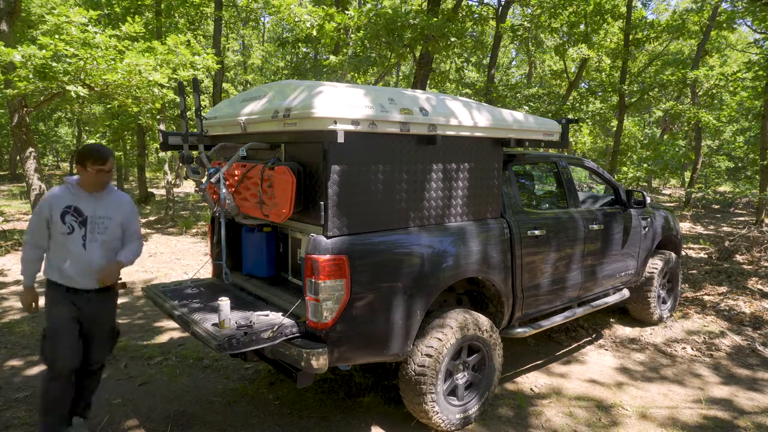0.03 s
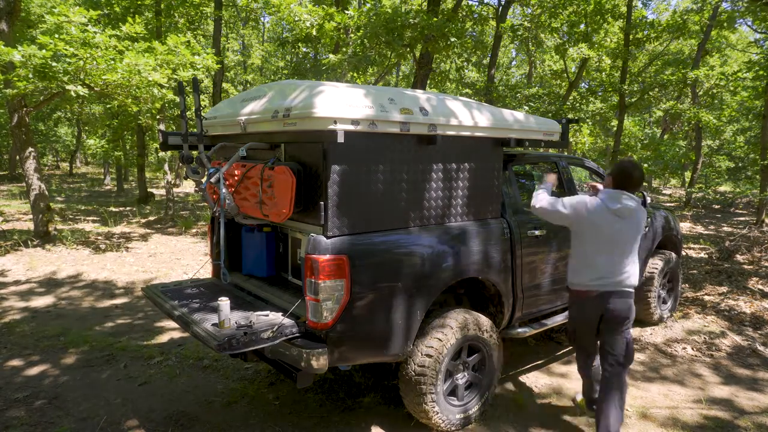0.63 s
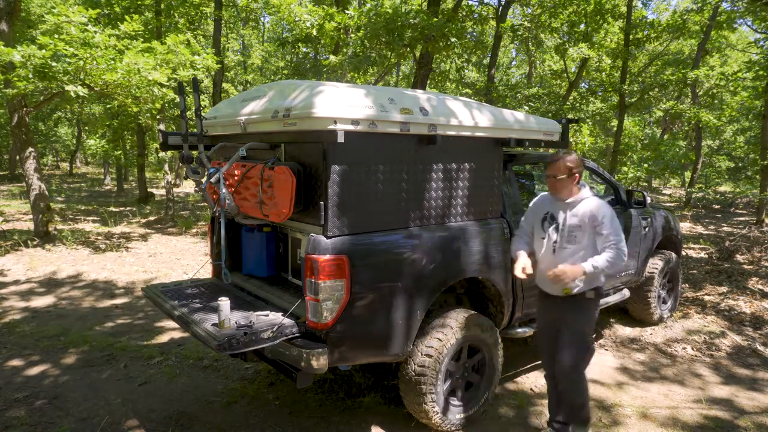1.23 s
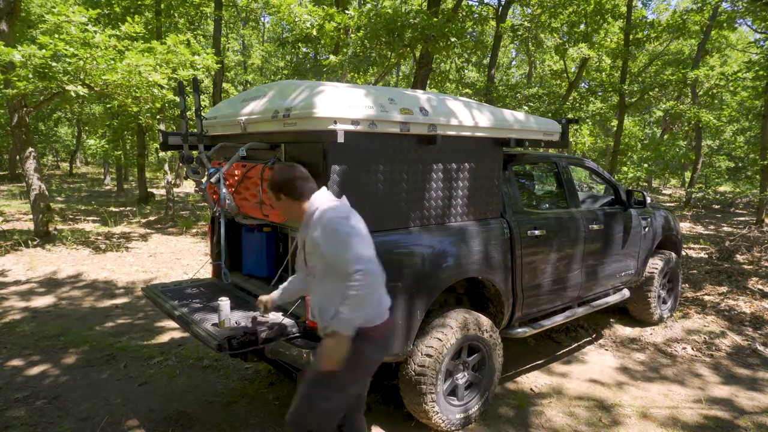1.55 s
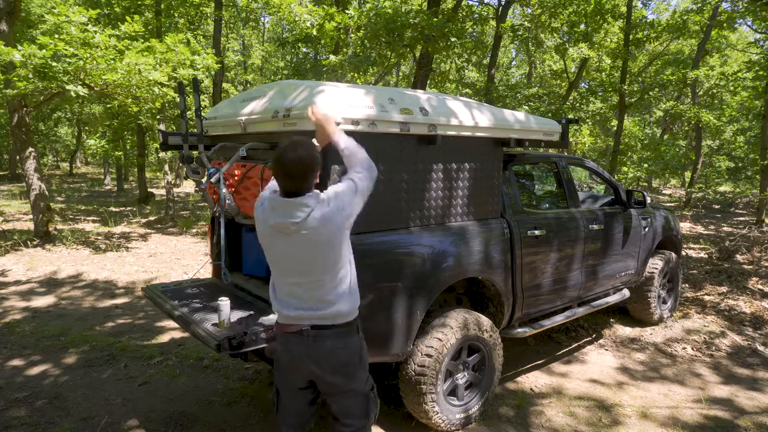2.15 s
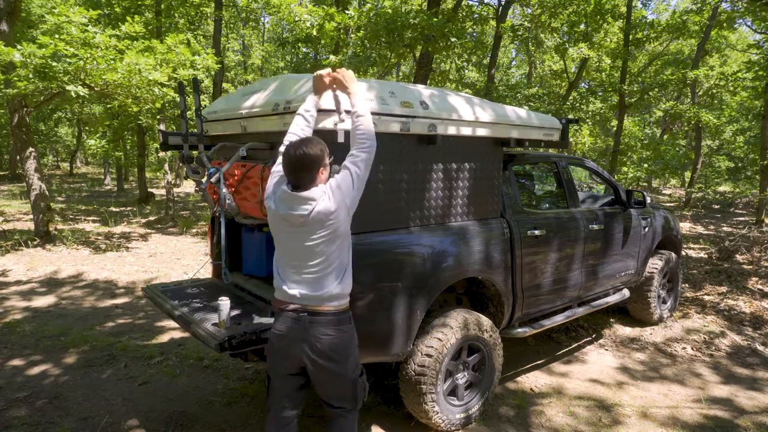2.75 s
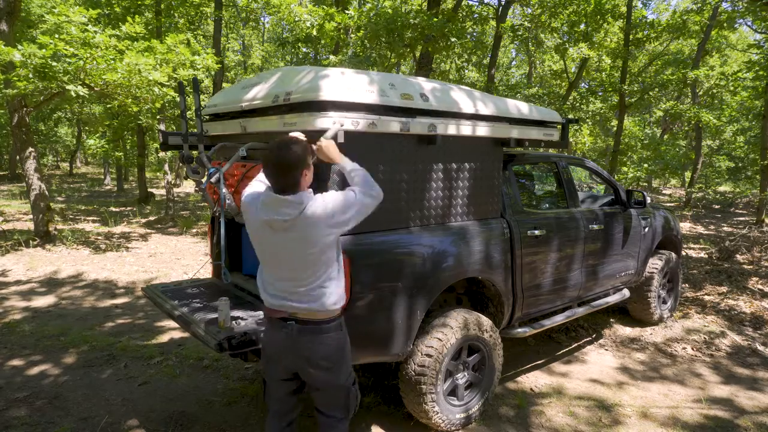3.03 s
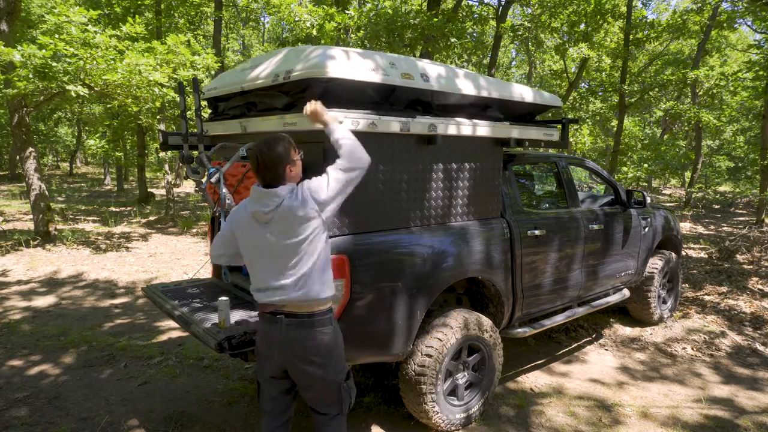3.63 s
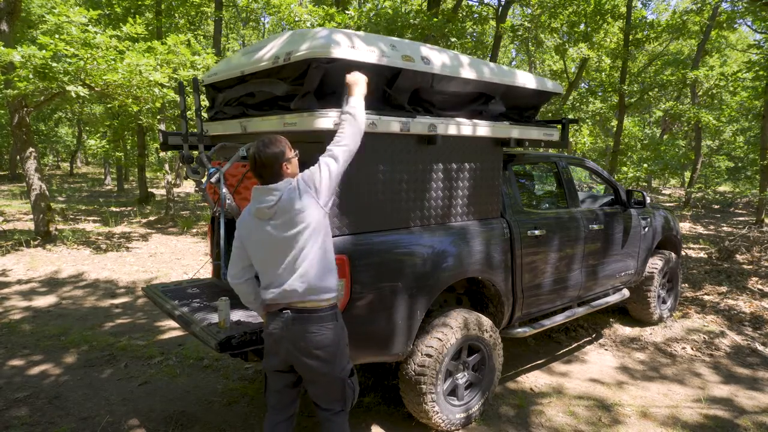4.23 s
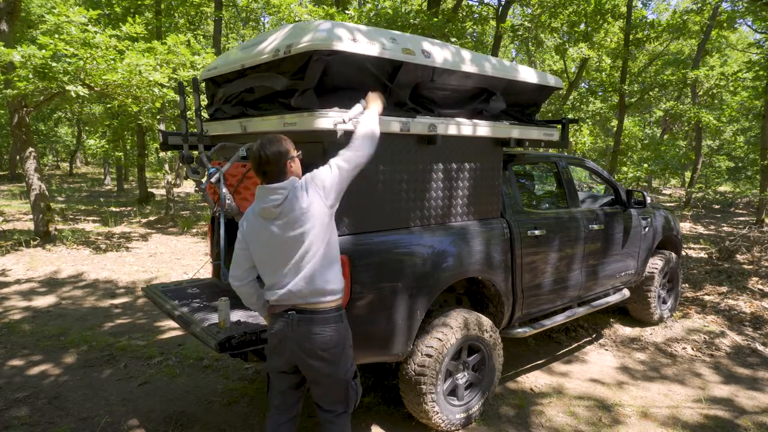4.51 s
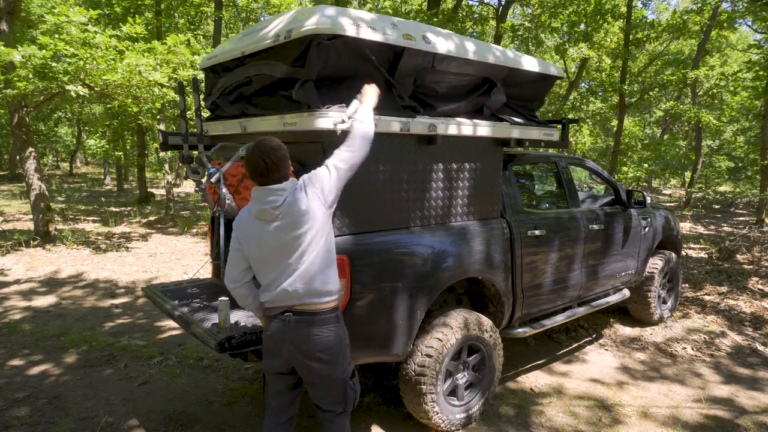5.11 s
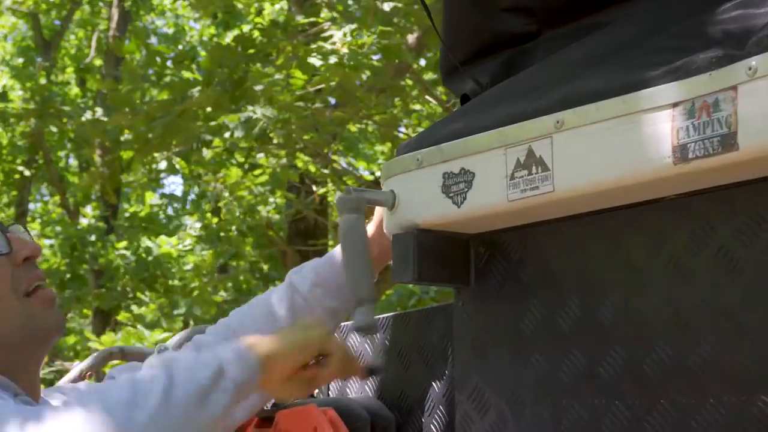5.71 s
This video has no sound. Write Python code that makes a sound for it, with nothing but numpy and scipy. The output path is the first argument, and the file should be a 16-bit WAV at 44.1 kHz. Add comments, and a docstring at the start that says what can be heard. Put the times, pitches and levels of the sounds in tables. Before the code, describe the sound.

Outdoors among trees, someone walks over dry leaves and cracking twigs, and a metal catch snaps open. A cluster of ringing clanks and hollow knocks follows as a crank is fitted to a roof tent. After some brushing of clothes, the crank winds steadily, its ratchet ticking quickly and its gears knocking. Soft wind buffets the microphone over a faint hush of foliage.

```python
"""In a wood, a man walks round a pickup: dry leaves crackle and twigs snap under his feet.
He frees the catch of a hard-shell roof tent and pushes a steel crank into its socket, so that the
steel rings and the hollow shell knocks. His sleeves brush as he winds the lid up: a pawl (a small
sprung finger) ticks over the teeth of the ratchet wheel, and the gears knock.
A light breeze rumbles on the microphone over the hush of the trees."""
import sys
import numpy as np
from scipy import signal
from scipy.fft import rfft, irfft, next_fast_len
from scipy.io import wavfile
from scipy.ndimage import map_coordinates

SR = 44100
rng = np.random.default_rng(int(sys.argv[2]) if len(sys.argv) > 2 else 0)


def put_to_file(sound):
    """Save the sound as 16-bit audio at rate SR, in the file named by the first command-line argument."""
    columns = np.atleast_2d(sound).T  # one column per channel
    safe = np.clip(columns, -1, 1)
    whole_steps = np.round(safe * 32767)
    wavfile.write(sys.argv[1], SR, whole_steps.astype(np.int16))


N = 254016

# tone of the rattling winch (pitch [Hz], level [dB])
WINCH_TONE = [(240, -45), (400, -17), (595, -8.5), (847, -6.5), (1490, -15), (2120, -9), (3850, -13.5),
              (4490, -13), (8280, -20), (9790, -30), (15500, -37)]


def amp(db):
    """Turn decibels into a number to multiply by."""
    return 10 ** (np.asarray(db) / 20)


def unit(x):
    """Scale a sound to an average strength (rms) of 1."""
    return x / np.sqrt(np.mean(x ** 2) + 1e-20)


def curve(points):
    """Join (time [s], value) points with straight lines, one value per sample."""
    times, values = np.transpose(points)
    return np.interp(np.arange(N) / SR, times, values)


def wobble(rate):
    """A smooth curve through `rate` random values a second."""
    return map_coordinates(rng.standard_normal(int(N * rate / SR) + 4), [np.arange(N) * rate / SR])


def filtered(x, response):
    """Multiply each frequency in a sound by response(frequency)."""
    size = next_fast_len(len(x) + SR // 10)
    return irfft(rfft(x, size) * response(np.fft.rfftfreq(size, 1 / SR)), size)[:len(x)]


def coloured(x, tone):
    """Shape a sound's bass and treble by (pitch [Hz], level [dB]) points."""
    pitches, db = np.transpose(tone)
    return filtered(x, lambda hz: amp(np.interp(np.log(hz + 1), np.log(pitches + 1), db)))


def resonate(x, notes):
    """Pass a sound through an object that rings at (pitch [Hz], width [Hz], level [dB])."""
    return filtered(x, lambda f: sum((-1) ** k * amp(db) * 1j * f * width
                                     / (hz * hz - f * f + 1j * f * width)
                                     for k, (hz, width, db) in enumerate(notes)))


def noise(tone, size=N):
    """Smooth noise with the given tone."""
    return unit(coloured(rng.standard_normal(size), tone))


def gritty(tone, size, grit_db):
    """Rough noise made of tiny contacts of uneven size."""
    sizes = amp(grit_db * np.clip(rng.standard_normal(size), -2, 2))
    return unit(coloured(rng.standard_normal(size) * sizes, tone))


def fade(t, attack, t60):
    """Rise quickly to 1, then die away; t60 is the fade time, the seconds taken to drop 60 dB."""
    shape = (1 - np.exp(-t / attack)) * amp(-60 * t / t60)
    return shape / shape.max()


def burst(x, shape):
    """Give noise a loudness shape, and exactly the energy of that shape."""
    return unit(x * shape) * np.sqrt(np.mean(shape ** 2))


def ringing(notes, t, spread_db):
    """The fading notes of struck metal, at new strengths for every blow."""
    return sum(amp(db + spread_db * rng.standard_normal() - 60 * t / t60)
               * np.sin(2 * np.pi * (hz * t + rng.random())) for hz, db, t60 in notes)


def add(track, start, sound):
    """Mix a sound into the track at `start` seconds."""
    room = track[max(round(start * SR), 0):][:len(sound)]
    room += sound[:len(room)]


def passes(position):
    """The samples at which a rising position passes a whole number."""
    return np.flatnonzero(np.diff(np.floor(position)))


def breeze(rumble_db=-1, flutter_db=-8.5, hush_db=-52):
    """Lumpy wind on the microphone over the steady hush of the trees."""
    # strength of the wind (time [s], level [dB])
    wind = [(0, -46), (0.3, -42.5), (0.78, -45), (1.1, -52.5), (1.33, -46), (1.62, -47.5), (2.0, -37),
            (2.45, -46.5), (2.65, -39), (3.37, -43.5), (3.5, -51), (3.9, -45.5), (4.2, -41), (4.45, -49.5),
            (4.95, -48.5), (5.19, -52), (5.31, -36.5), (5.76, -56.5)]
    # hush of the trees (pitch [Hz], level [dB])
    hush_tone = [(100, -17), (250, 2.5), (500, -3), (900, -3.5), (1500, -1.5), (3000, -10.5), (6000, -14.5),
                 (10000, -21.5), (16000, -26)]
    wind_db = curve(wind)
    gust_db = wind_db - wind_db.mean()
    rumble = amp(rumble_db + 0.95 * gust_db + 2.6 * wobble(14))
    rumble *= noise([(10, -20), (22, -3), (75, -2), (110, -10.5), (170, -35), (400, -94)])
    flutter = amp(flutter_db + 1.22 * gust_db)  # grows faster than the rumble: gusts are brighter
    flutter *= noise([(70, -43), (115, -0.5), (190, -7), (300, -15), (500, -31.5), (1200, -45)])
    return amp(wind_db.mean()) * (rumble + flutter) + amp(hush_db) * noise(hush_tone)


def sweeps(sole_db=-4, swell_s=0.014, settle_s=0.029):
    """Loudness of the rustle: each heel, sole and sleeve swells quickly and settles more slowly."""
    # steps in the leaves (time [s], heel level [dB], wait until the sole lands [s])
    steps = [(0.06, -30.5, 0.13), (0.379, -24.5, 0.11), (0.6, -36, 0.084), (0.81, -37.5, 0.072),
             (1.21, -30.5, 0.14), (1.454, -36.5, 0.072), (1.655, -43, 0.1005)]
    # sleeves brushing as the arms work (time [s], level [dB])
    sleeves = [(1.82, -36), (2.345, -31), (2.58, -36.5), (2.72, -39), (2.855, -30.5), (2.965, -38.5),
               (3.05, -39.5), (3.29, -54), (3.44, -48), (5.39, -32.5)]
    heels = [(start, db) for start, db, wait in steps]
    soles = [(start + wait, db + sole_db) for start, db, wait in steps]
    now = np.arange(N) / SR
    return sum(amp(db) * np.exp(-np.abs(now - peak) / np.where(now < peak, swell_s, settle_s))
               for peak, db in heels + soles + list(sleeves))


def rustle(grains_per_s=1500, stalks_per_s=60, crackle_db=-12, brush_db=-13.5, stalk_db=-18.5):
    """Leaves brush and crackle and stalks break underfoot; once he stands still, his clothes rustle."""
    # tone of dry leaves, also used for the cloth (pitch [Hz], level [dB])
    leaf_tone = [(530, -62), (900, -9), (1430, 1.5), (1590, 0), (1730, -2.5), (2150, 1), (15500, -0.5)]
    walking = np.arange(N) / SR < 1.7
    sizes = amp(4.5 * np.minimum(rng.exponential(size=N), 3.5))
    grains = (rng.random(N) < grains_per_s / SR) * rng.choice([-1, 1], N) * sizes
    crackle = amp(crackle_db) * unit(coloured(grains, leaf_tone))
    breaks = (rng.random(N) < stalks_per_s / SR) * rng.uniform(-0.73, 1, N)
    stalks = amp(stalk_db) * walking * unit(resonate(breaks, [(2800, 700, 0), (4600, 1500, -2)]))
    shuffle = amp(np.where(walking, -42, -49) + 3 * wobble(19.52))  # leaves and cloth never quite rest
    loudness = (sweeps() + shuffle) * amp(2 * wobble(150))  # the leaves give way in clumps
    brush = amp(brush_db) * noise(leaf_tone)
    return loudness * (crackle + brush + stalks)


def twig_snaps(gain_db=-8):
    """Twigs break underfoot with a short, gritty crack; a thick twig has more body."""
    # breaking twigs (time [s], level [dB], body [dB])
    snaps = [(0.032, -24, -22), (0.118, -22.5, -19), (0.156, -28, -30), (0.197, -22.5, -30),
             (0.475, -25, 6), (0.487, -26.5, -26), (0.532, -13, -11.5), (0.584, -21.5, -7),
             (0.676, -24.5, -15), (0.776, -24, -17), (0.825, -17.5, -45), (0.86, -18, -18.5),
             (1.329, -27.5, -3), (1.449, -22, -16), (1.63, -19.5, -8)]
    out, t = np.zeros(N), np.arange(SR // 10) / SR
    for start, db, body_db in snaps:
        tone = [(150, -29), (500, body_db), (1200, body_db + 2.5),
                (3500, -10.5), (10000, -20.5), (16000, -19.5)]
        crack = burst(gritty(tone, len(t), grit_db=7), fade(t, attack=0.00046, t60=0.014))
        add(out, start, amp(db + gain_db) * crack)
    return out


def clanks(gain_db=-9, ring_db=-9, slide_db=-17, slide_s=0.0028):
    """Catch and crank slide in, scrape, knock the hollow shell and leave the steel ringing."""
    # blows on the shell (time [s], level [dB], amount of knock [dB], fade time of the scrape [s])
    blows = [(0.9165, -11.5, -16, 0.035), (0.925, -18.5, -12, 0.057), (1.842, -22.5, -16.5, 0.043),
             (1.876, -40.5, 12.5, 0.019), (1.934, -11.5, -12, 0.017), (1.955, -12.5, -8.5, 0.031),
             (2.002, -14.5, -9, 0.036), (2.028, -16.5, -4, 0.063), (2.04, -8.5, -11, 0.042),
             (2.059, -19, -1, 0.037), (2.166, -17.5, 2, 0.025), (2.188, -24.5, -4.5, 0.021),
             (2.202, -24.5, -2, 0.058), (2.276, -33.5, -4, 0.047), (2.367, -25.5, 3.5, 0.012),
             (2.416, -27.5, -3, 0.022), (2.449, -20.5, -14, 0.015), (2.5, -29, 4, 0.041),
             (2.54, -34.5, 0, 0.045), (2.602, -32, -4, 0.035)]
    # notes of the crank and the shell that holds it (pitch [Hz], level [dB], fade time [s])
    steel_notes = [(208, -5, .2), (693, -3, .1), (990, 3, .095), (1115, 0, .08), (1365, 0, .1),
                   (1735, -2, .07), (1950, -1, .075), (2610, -2, .07), (2830, -7, .09), (3465, -2, .07),
                   (4210, -3, .06), (7430, -1, .04), (10380, -4, .05)]
    knock_tone = [(100, -1.5), (380, -19), (700, -4), (1150, -0.5), (1800, -3.5), (3200, -30)]
    out, t = np.zeros(N), np.arange(SR // 4) / SR
    for start, db, knock_db, t60 in blows:
        bright_db = -14 - 0.96 * knock_db  # a glancing blow is bright, a square one knocks
        tone = [(900, -14), (2200, 5.5), (4000, 3.5), (9000, bright_db + 4.5), (16000, bright_db - 1.5)]
        scrape = gritty(tone, len(t), grit_db=1.5)
        knock = amp(knock_db) * noise(knock_tone, len(t))
        knock_shape = amp(3) * fade(t, 0.00083, 1.45 * t60)
        shell_shape = amp(-20) * fade(t, 0.0045, 0.076)
        body = amp(knock_db) * burst(knock, knock_shape + shell_shape)
        # a dull blow wakes the low notes, a bright one the high notes
        struck = [(hz, level + np.interp(hz, [1500, 4000, 9000], [knock_db, -3, bright_db + 4]), life)
                  for hz, level, life in steel_notes]
        ring = amp(ring_db) * ringing(struck, t, spread_db=1.5) * (1 - np.exp(-t / 0.00094))
        add(out, start, amp(db + gain_db) * (burst(scrape, fade(t, 0.0012, t60)) + body + ring))
        # the parts rub for a few milliseconds before the blow lands
        slide = (scrape + knock) * np.exp((t - t[-1]) / slide_s)
        add(out, start - t[-1], amp(db + gain_db + slide_db) * slide)
    return out


def steel_ticks(gain_db=3):
    """Steel meets steel in a hard, dry tick as the catch or the crank snaps home."""
    # parts snapping home (time [s], level [dB])
    ticks = [(0.9224, -7.5), (1.8546, -15.5), (1.933, -10.5), (2.0406, -6.5), (2.5918, -13.5)]
    out, t = np.zeros(N), np.arange(SR // 50) / SR
    for start, db in ticks:
        crack = noise([(800, -19), (3500, 1), (9000, -6.5), (16000, -3.5)], len(t))
        crack *= fade(t, attack=0.0001, t60=0.0054)
        add(out, start + 0.0015, amp(db + gain_db) * crack / np.abs(crack).max())
    return out


def crank_clink(start=1.573, db=-32.5):
    """The crank drags briefly on the tailgate as it is picked up."""
    # notes of the dragged crank (pitch [Hz], width [Hz], level [dB])
    crank_notes = [(890, 250, -10), (1610, 90, -2), (1750, 130, -0.5), (2120, 90, -3), (2780, 180, -10),
                   (3330, 110, -5.5), (3730, 130, -16), (5130, 250, -18)]
    out, t = np.zeros(N), np.arange(SR // 8) / SR
    drag = resonate(rng.standard_normal(len(t)), crank_notes)
    add(out, start, amp(db) * burst(drag, fade(t, attack=0.025, t60=0.053)))
    return out


def shaft_squeak(start=2.71, length_s=0.04, hz=6600, width_hz=400, db=-55):
    """The dry shaft squeaks thinly as it begins to turn."""
    out, size = np.zeros(N), round(length_s * SR)
    whistle = filtered(rng.standard_normal(size), lambda f: np.exp(-((f - hz) / width_hz) ** 2))
    add(out, start, amp(db) * unit(whistle) * signal.windows.tukey(size))
    return out


def wheel(start=3.1, teeth=9, start_turns=0.32):
    """Speed [teeth per s] and angle [turns] of the ratchet wheel, for every sample."""
    # pace of the winding (time [s], speed [teeth per s])
    pace = [(3.1, 49.0), (3.4, 49.0), (3.85, 63.6), (4.4, 64.7), (4.72, 81.8), (5.0, 69.7), (5.3, 59.0),
            (5.76, 70.6)]
    speed = curve(pace) * (np.arange(N) / SR > start)
    return speed, start_turns + np.cumsum(speed) / SR / teeth


def ratchet(rattle_db=-3, housing_db=-2, pawl_db=-53, click_db=-59, rub_db=-52):
    """The gears rub; the pawl ticks as it drops off each tooth, and the housing rings and rattles."""
    # how hard the winch works (time [s], level [dB])
    load = [(3.1, -51.5), (3.7, -43.5), (4.05, -44.5), (4.2, -42.5), (5.1, -43), (5.76, -44)]
    # notes of the winch housing (pitch [Hz], width [Hz], level [dB])
    housing_notes = [(828, 110, 5.5), (1114, 102, 7), (1330, 230, 3.5), (2130, 370, 2), (2554, 230, 1),
                     (3100, 230, -0.5), (3530, 82, -3), (4190, 400, -7), (4620, 170, -3.5),
                     (5520, 780, -11)]
    # notes of the pawl (pitch [Hz], width [Hz], level [dB])
    pawl_notes = [(4500, 2500, -3), (7280, 250, 0), (8350, 750, 0), (12400, 420, -3), (15100, 700, -9)]
    speed, turns = wheel()
    sway = np.cos(2 * np.pi * turns)  # the wheel is off centre: faster and harder once a turn
    uneven_speed = speed * (1 + 0.09 * sway + 0.08 * wobble(50))
    teeth = passes(np.cumsum(uneven_speed) / SR)
    drops, shake = np.zeros((2, N))
    t = np.arange(SR // 20) / SR
    for i, (force, edge) in zip(teeth, np.clip(rng.standard_normal((len(teeth), 2)), -2, 1)):
        blow = amp(2 * force + 0.95 * sway[i])
        skim_db = -np.log2(speed[i] / speed.max())  # at speed the pawl skims and lands more softly
        drops[i] = blow * amp(2.8 * edge + 2 * sway[i] + skim_db)
        scrape = blow * fade(t, attack=0.0019, t60=0.031)
        add(shake, i / SR - 0.001, scrape ** 2)  # the tooth scrapes just before the drop

    def at_level(db, x):
        """Set a sound's average level, counted from the first tooth on."""
        return amp(db) * x / np.std(x[teeth[0]:])

    rattle = at_level(rattle_db, np.sqrt(shake) * noise(WINCH_TONE))
    housing = at_level(housing_db, resonate(np.sqrt(shake) * rng.standard_normal(N), housing_notes))
    pawl = at_level(pawl_db, resonate(drops, pawl_notes))  # driven by its spring, whatever the load
    click_tone = [(800, -28), (2500, 3), (6000, -1.5), (10000, -29), (15500, -1)]
    click = at_level(click_db, coloured(drops, click_tone))
    rub_rise = curve([(2.8, 0), (2.98, 1)])  # the gears rub before the pawl catches
    rub = amp(rub_db) * rub_rise * unit(resonate(rng.standard_normal(N), housing_notes))
    return amp(curve(load)) * (rattle + housing) + rub + pawl + click


def gear_knocks(gain_db=-3, crack_db=-5, light_db=-39):
    """Once a turn the gears take up their slack with a hollow knock, sometimes light, sometimes heavy."""
    # the heavy knocks (time [s], level [dB])
    heavy = [(3.815, -35), (4.224, -29), (4.519, -28), (4.758, -28), (4.983, -26), (5.093, -24), (5.5, -30),
             (5.636, -28)]
    # notes of the gears (pitch [Hz], level [dB], fade time [s])
    gear_notes = [(822, -14, 0.096), (877, -1.5, 0.038), (1073, -5, 0.028), (1290, -5, 0.032),
                  (2040, -15, 0.014), (2820, -3.5, 0.019)]
    out, t = np.zeros(N), np.arange(SR // 10) / SR
    _, turns = wheel()
    heavy_turns = [int(turns[round(start * SR)]) for start, db in heavy]
    light = [(i / SR, light_db + 1.2 * rng.standard_normal())
             for i in passes(turns + 0.5) if int(turns[i]) not in heavy_turns]
    for start, db in list(heavy) + light[1:]:  # no first knock: the gears have yet to mesh
        ring = ringing(gear_notes, t, spread_db=4.5) * (1 - np.exp(-t / 0.00063))
        crack = amp(crack_db) * burst(noise(WINCH_TONE, len(t)), fade(t, attack=0.00025, t60=0.014))
        add(out, start, amp(db + gain_db) * (ring + crack))
    return out


def with_echo(x, echo_db=-24, t60=0.37):
    """A faint scatter of sound comes back from the truck and the tree trunks."""
    t = np.arange(SR // 2) / SR
    tail = noise([(200, -11), (1200, -17), (5000, -14), (16000, -13)], len(t)) * fade(t, 0.0034, t60)
    return x + amp(echo_db) * signal.fftconvolve(x, tail / np.linalg.norm(tail))[:N]


def scene():
    """The man's work, its echo and the breeze, in one channel."""
    work = rustle() + twig_snaps() + crank_clink() + clanks() + steel_ticks()
    work += ratchet() + gear_knocks() + shaft_squeak()
    return (with_echo(work) + breeze())[None]


def record(dry, top_hz=15900):
    """Cut off the very highest treble."""
    return np.array([filtered(x, lambda hz: hz < top_hz) for x in dry])


dry = scene()
out = record(dry)
put_to_file(out)
```